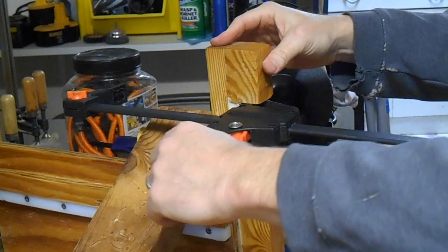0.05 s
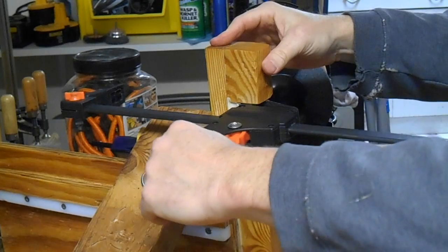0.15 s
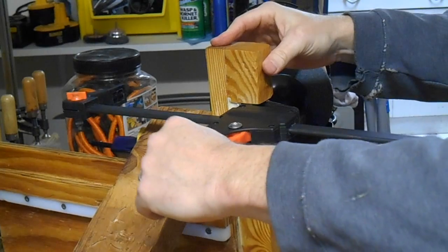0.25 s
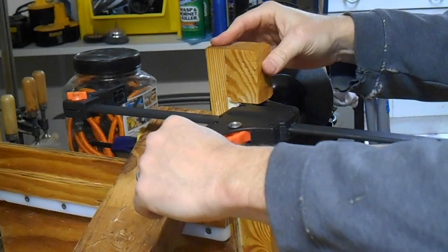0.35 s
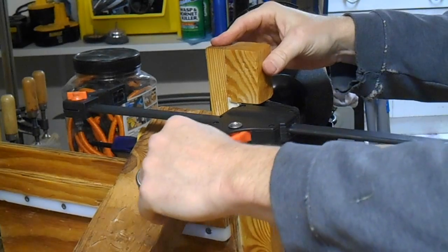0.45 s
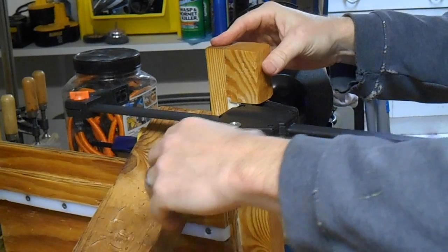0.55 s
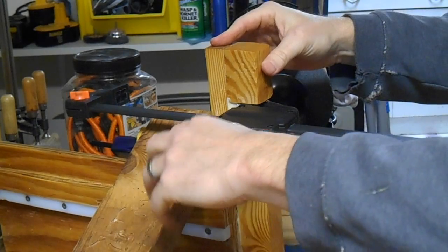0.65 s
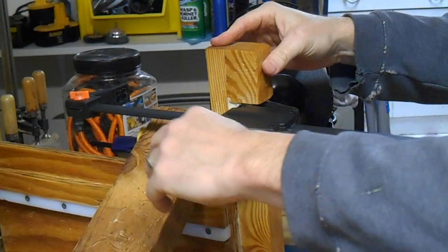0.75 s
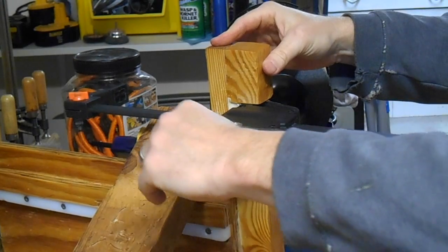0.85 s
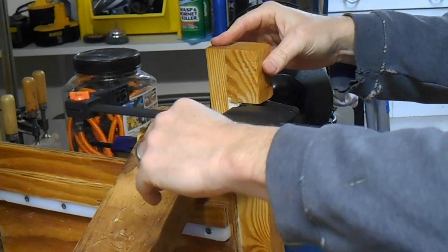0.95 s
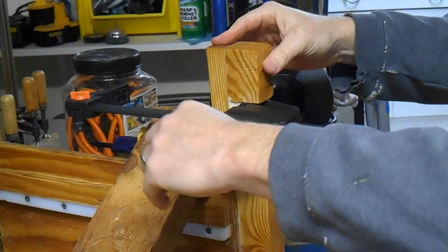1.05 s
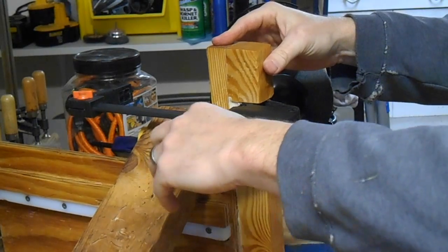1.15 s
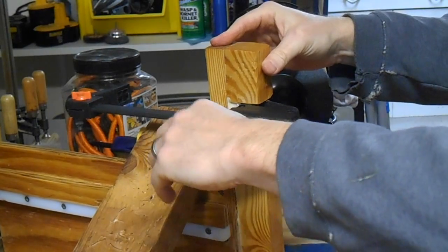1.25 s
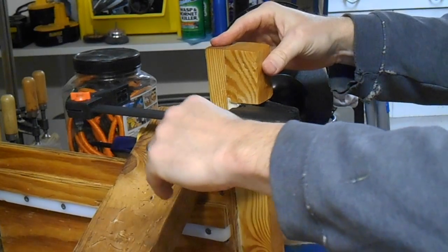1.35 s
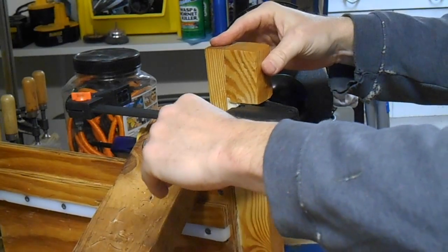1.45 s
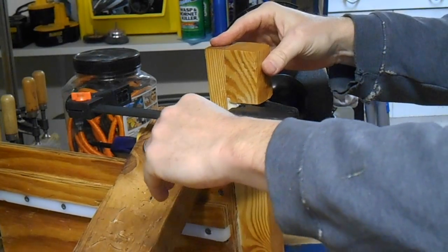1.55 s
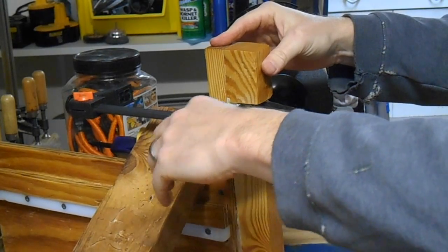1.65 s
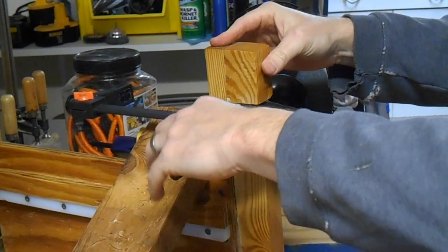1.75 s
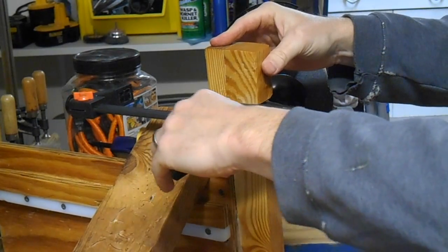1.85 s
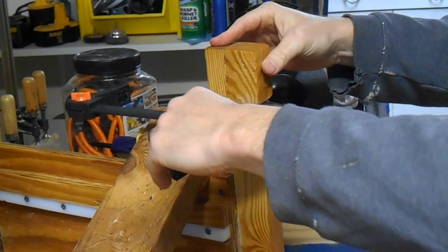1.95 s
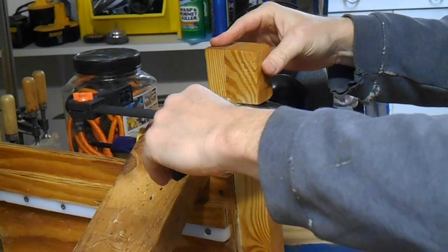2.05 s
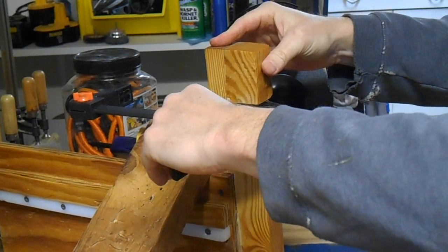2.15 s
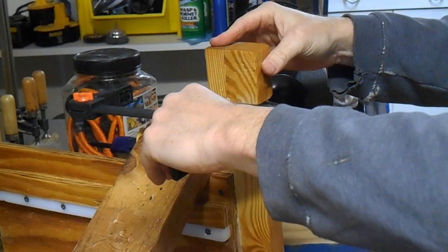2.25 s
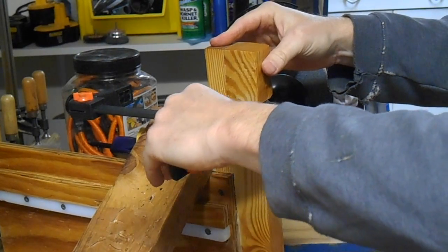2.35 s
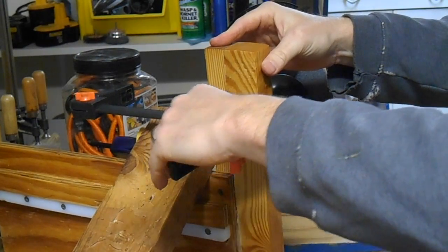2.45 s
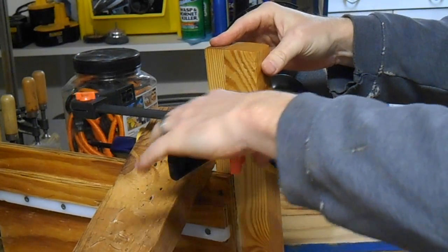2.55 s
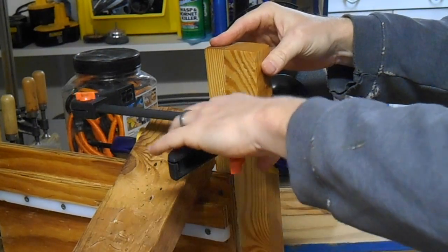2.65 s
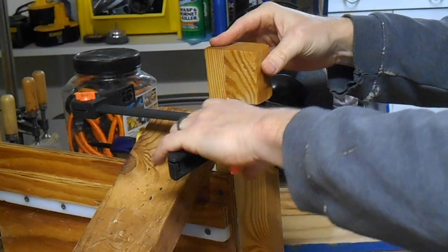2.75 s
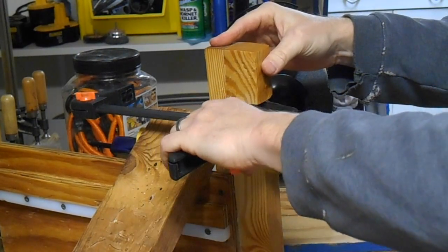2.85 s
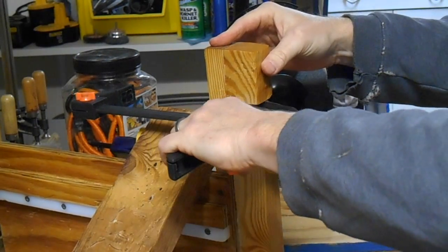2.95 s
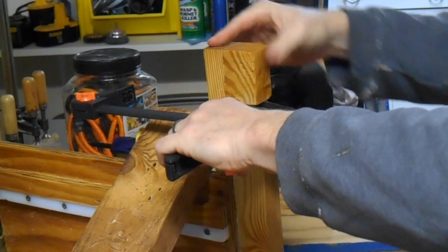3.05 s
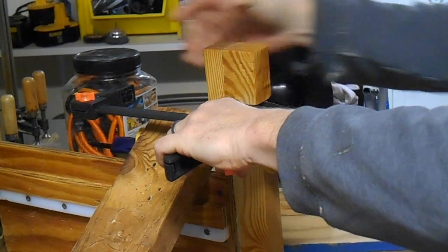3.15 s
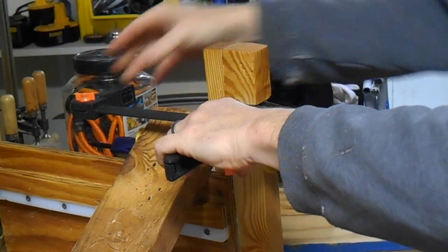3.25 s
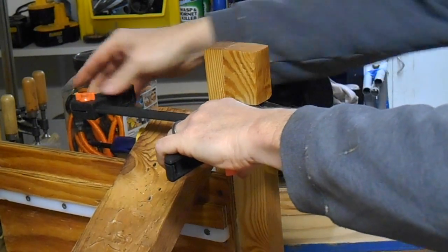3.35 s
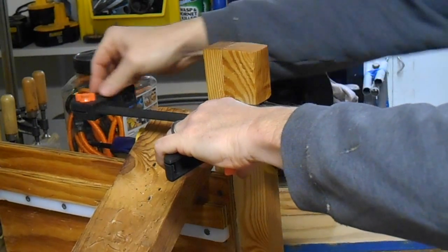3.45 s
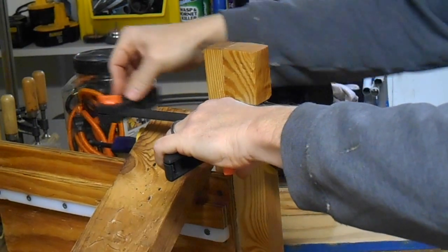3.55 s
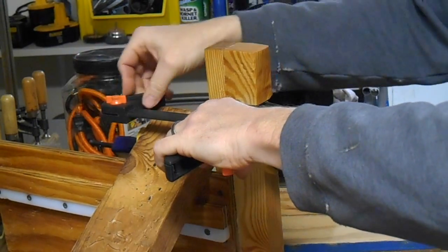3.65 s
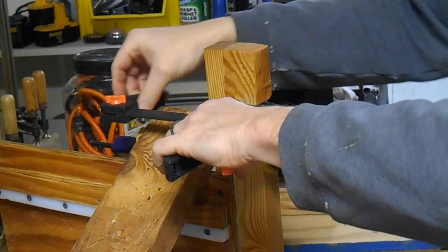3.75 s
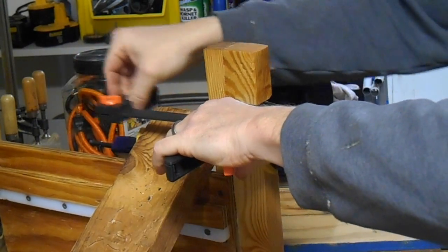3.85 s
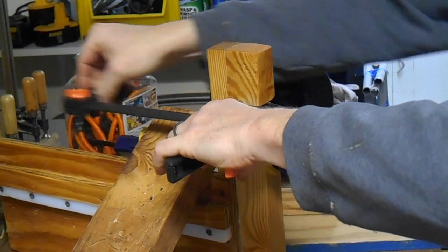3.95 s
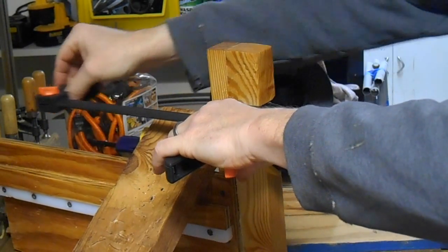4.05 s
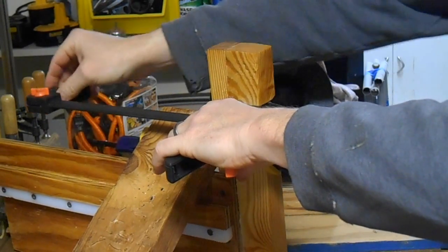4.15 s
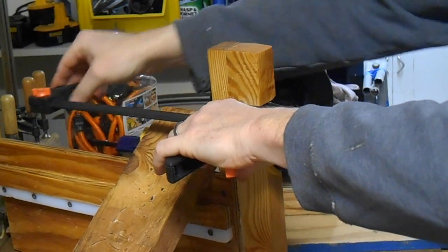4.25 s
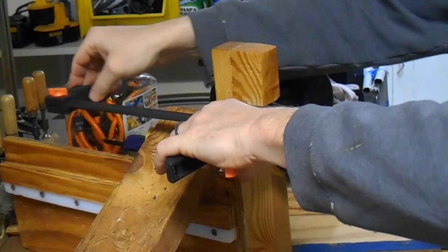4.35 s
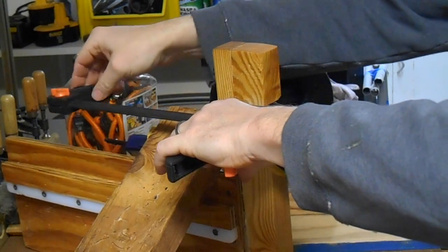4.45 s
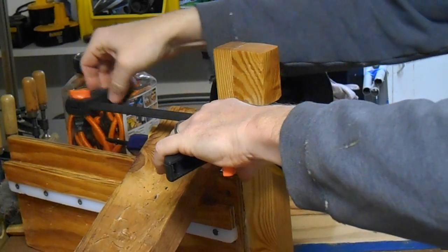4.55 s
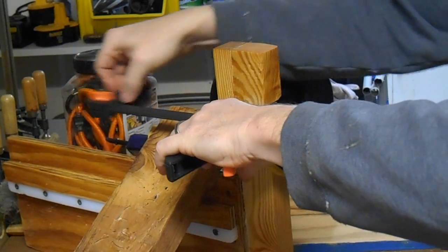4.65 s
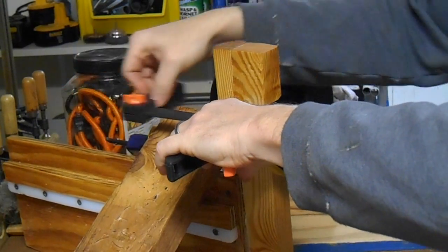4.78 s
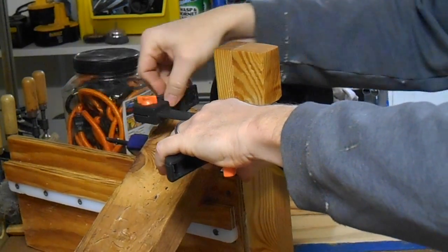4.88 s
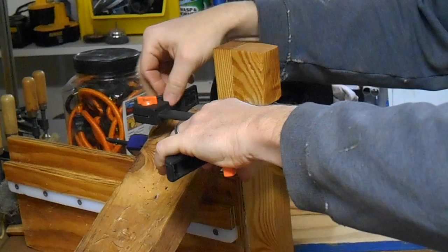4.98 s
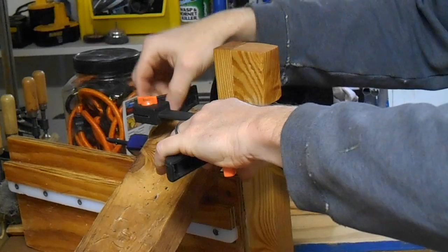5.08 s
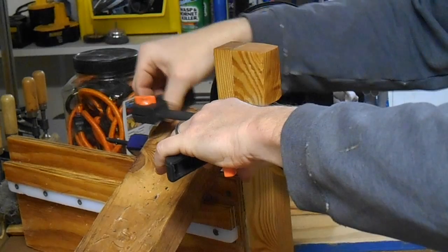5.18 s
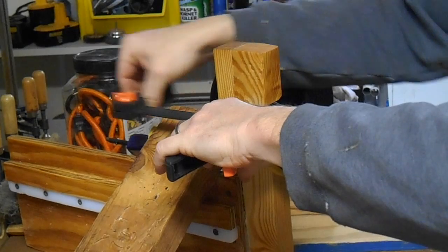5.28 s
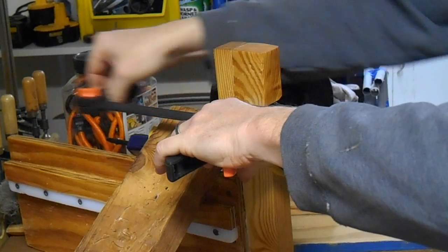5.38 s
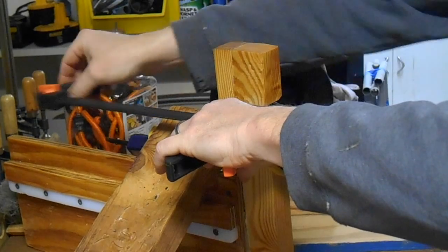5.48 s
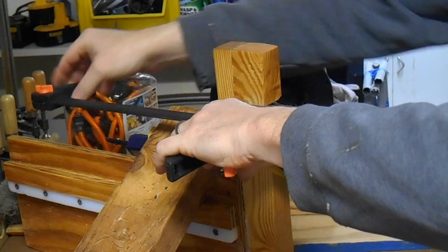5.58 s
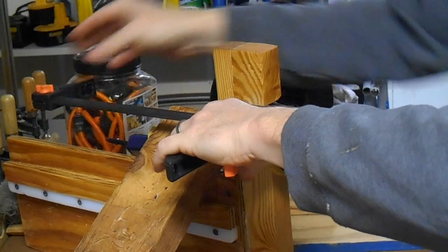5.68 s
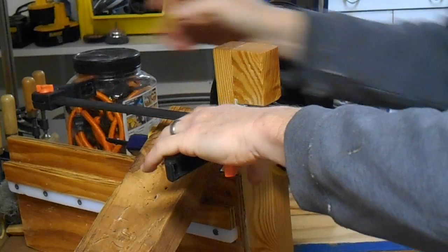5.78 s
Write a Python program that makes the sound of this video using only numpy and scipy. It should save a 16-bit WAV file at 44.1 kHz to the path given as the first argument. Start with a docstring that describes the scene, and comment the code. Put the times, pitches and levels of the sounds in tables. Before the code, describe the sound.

A one-handed bar clamp clicks and chatters through four trigger squeezes, then its steel bar scrapes back and forth, knocking against its stops.

```python
"""Bar clamp in a workshop

A small workshop, one mono microphone close to a one-handed bar clamp. Four squeezes of the trigger
each bite the steel bar and snap it forward; after the first three the sprung trigger chatters back.
Then the bar is pulled to and fro by hand, scraping through the plastic housing and knocking against
its stops. The steel rings, the timber underneath bumps, and the room answers briefly."""
import sys
import numpy as np
from scipy import signal
from scipy.fft import rfft, irfft
from scipy.io import wavfile
from scipy.ndimage import uniform_filter1d

SR = 44100
rng = np.random.default_rng(int(sys.argv[2]) if len(sys.argv) > 2 else 0)


def persist_wave(psi):
    """Save psi, clipped to +-1, as 16-bit WAV."""
    counts = np.round(np.clip(psi, -1, 1) * 32767).astype(np.int16)
    wavfile.write(sys.argv[1], SR, np.atleast_2d(counts).T)


N = 256662
BINS_HZ = np.fft.rfftfreq(2048, 1 / SR)


def amp(db):
    """Decibels to gain."""
    return 10 ** (np.asarray(db) / 20)


def unit(x):
    """Scales to rms 1."""
    return x / np.sqrt(np.mean(x ** 2) + 1e-20)


def decay(t, t60):
    """A free ring loses 60 dB every t60 seconds."""
    return amp(-60 * t / t60)


def read(points, hz):
    """Reads a table on a log-frequency axis."""
    f, value = np.transpose(points)
    return np.interp(np.log(hz + 1), np.log(f + 1), value)


def add(mix, s, sound):
    """Lays a sound into the mix at s seconds."""
    part = mix[max(round(s * SR), 0):][:len(sound)]
    part += sound[:len(part)]


def colour(x, db):
    """Causal filter of unit energy, shaped by db on BINS_HZ."""
    log_gain = np.log(amp(np.concatenate([db, db[-2:0:-1]])))
    taps = np.fft.ifft(np.exp(np.conj(signal.hilbert(log_gain)))).real
    return signal.fftconvolve(x, taps / np.linalg.norm(taps))[:len(x)]


def contact(t60, crack, skid_s=0, rise_s=0.00055):
    """A sharp crack, then the crowded, quickly damped ring of the housing; a skid holds it up."""
    t = np.arange(SR // 8) / SR
    body = decay(np.maximum(t - skid_s, 0), t60)
    envelope = (body + crack * np.exp(-t / 0.0018)) * (1 - np.exp(-t / rise_s))
    return rng.standard_normal(len(t)) * envelope


def clicks(rows, spectrum, gain_db, t60, crack):
    """Firm contacts of one kind; harder ones are brighter."""
    out = np.zeros(N)
    octaves = np.log2(np.clip(BINS_HZ, 700, 12000) / 3500)
    for s, db, hardness, *skid in rows:
        shape_db = read(spectrum, BINS_HZ) + hardness * octaves
        add(out, s, amp(db + gain_db) * colour(contact(t60, crack, *skid), shape_db))
    return out


def ticks(rows, gain_db, t60, crack, sharpness, mellow_ratio):
    """Light contacts, each through one resonance of the part touched; low ones are dull."""
    out, hz = np.zeros(N), BINS_HZ + 1
    for s, db, centre_hz, *_ in rows:
        hump_db = -10 * np.log10(1 + (sharpness * (hz / centre_hz - centre_hz / hz)) ** 2)
        mellow_db = -10 * np.log10(1 + (hz / (mellow_ratio * centre_hz)) ** 4 + (hz / 9500) ** 10)
        tick = colour(contact(t60, crack, rise_s=0.00074), hump_db + mellow_db)
        add(out, s, amp(db + gain_db) * tick)
    return out


# Room tone of the workshop. Each row: frequency in Hz, relative level in dB.
ROOM_TONE = [(25, -6.5), (70, -13.5), (280, -19.5), (620, -21), (1900, -16.5), (3500, -21.5), (9700, -28),
             (11000, -42.5), (13000, -47)]
def air(level_db=-47.5):
    """Steady room noise, strongest in the bass."""
    shape = amp(read(ROOM_TONE, np.fft.rfftfreq(N, 1 / SR)))
    return amp(level_db) * unit(irfft(rfft(rng.standard_normal(N)) * shape, N))


# Handling, close up. Each row: start in seconds, relative level in dB, centre in Hz.
FINGER_TICKS = [(.103, -19, 2480), (0.146, -16.5, 1760), (0.172, -19.5, 7400), (.211, -10, 1850),
                (0.223, -12, 2380), (0.391, -17, 5900), (2.134, -11, 2000), (3.1654, -17.5, 1740),
                (3.5, -12.5, 2040), (3.823, -16, 2230), (3.868, -21, 2040), (4.2613, -10.5, 2000),
                (5.036, -21.5, 5190)]
def touches(fidget_count=22):
    """Loose parts tick under the fingers and in the linkage, among faint chance touches."""
    fidgets = [(when * N / SR, -31 + 3 * (2 * force - 1), 2400 * 2 ** (2 * place - 1))
               for when, force, place in rng.random((fidget_count, 3))]
    rows = FINGER_TICKS + slack() + fidgets
    return ticks(rows, gain_db=-12, t60=0.054, crack=0.083, sharpness=1.3, mellow_ratio=2.57)


def nudges(timber_hz=187.5, clamp_hz=403, lag_s=0.01516):
    """Jumps, trigger returns, touches and knocks push on timber and clamp: rows of (s, dB, Hz)."""
    rows = [(s, -25.5, timber_hz) for s, *_ in jumps()]
    for start, jolt, db in TRIGGER_RETURNS:
        last_tick = start + SLACK_TIMING[-1] * (jolt - start)
        rows += [(last_tick, -29, 288), (jolt + lag_s, db - 27.5, timber_hz)]
    for s, db, _ in FINGER_TICKS:
        rows += [(s, db - 22.5, clamp_hz), (s, db - 26.5, timber_hz)]
    return rows + [(s + lag_s, db - 29, timber_hz) for s, db, _ in BAR_KNOCKS]


# Hollow bumps of the housing and the timber under it.
# Each row: start in seconds, relative level in dB, pitch in Hz, t60 in seconds.
HOLLOW_BUMPS = [(1.455, -26, 190, .15), (1.55, -31.5, 194, .15), (2.134, -28.5, 190, .15),
                (2.215, -33.5, 183, .15), (3.659, -3, 885, 0.046), (3.676, -12.5, 193, 0.057),
                (3.686, -26, 98, 0.25), (4.809, -28.5, 104, 0.22), (4.84, -20, 243, 0.13)]
def bumps(gain_db=-6, nudge_t60=0.16):
    """Each bump or nudge sounds a damped low note with a dull, shorter thud around it."""
    out, t = np.zeros(N), np.arange(SR // 3) / SR
    onset = 1 - np.exp(-t / 0.0018)
    for s, db, hz, t60 in HOLLOW_BUMPS + [(*row, nudge_t60) for row in nudges()]:
        note = np.sin(2 * np.pi * hz * t) * decay(t, t60)
        band_db = -np.minimum(24 * np.log2((BINS_HZ + 1) / hz) ** 2, 60)
        thud = colour(rng.standard_normal(len(t)) * decay(t, 0.69 * t60), band_db)
        add(out, s, amp(db + gain_db) * (note + 0.55 * thud) * onset)
    return out


# The grip shifts faintly. Each row: start and length in seconds, level in dB.
GRIP_RUBS = [(0.264, .11, -41), (4.93, 0.12, -40)]
# The bar is pulled through the housing.
# Each row: start, fastest moment and end in seconds, level in dB, attack in seconds.
BAR_PULLS = [(3.514, 3.629, 3.734, -20.5, 0.095), (3.901, 4.005, 4.187, -22, 0.052),
             (4.332, 4.433, 4.51, -27, 0.024), (4.535, 4.633, 4.667, -17.5, 0.11),
             (4.668, 4.762, 4.955, -19.5, 0.064), (5.25, 5.503, 5.618, -19, 0.04)]
def friction(swell_db_per_s=45, sag_db_per_s=44.5, stop_s=0.029, swing_s=0.04, swing_db=-37):
    """Strength of rubbing: pulls that swell and sag with speed, grip shifts, the trigger's swing."""
    t, pulls = np.arange(N) / SR, 0
    for start, fastest, end, db, attack in BAR_PULLS:
        starting = np.sin(np.pi / 2 * np.clip((t - start) / attack, 0, 1)) ** 2
        stopping = np.clip((end - t) / stop_s, 0, 1)
        drop_db = np.maximum(swell_db_per_s * (fastest - t), sag_db_per_s * (t - fastest))
        pulls = pulls + starting * stopping * amp(db - drop_db)
    rubs = sum(amp(db) * np.interp(t, [s, s + length / 2, s + length], [0, 1, 0])
               for s, length, db in GRIP_RUBS)
    swings = sum(np.interp(t, [s - swing_s, s], [0, 1], right=0) for s, *_ in TRIGGER_SQUEEZES)
    return pulls + rubs + amp(swing_db) * swings


def wander(x, patchy_db=3.5):
    """As the point of contact travels, it favours ever different modes."""
    spectra = signal.stft(x, nperseg=1024, noverlap=768)[2]
    patches = uniform_filter1d(rng.standard_normal(spectra.shape), size=5, axis=0)
    patches = unit(uniform_filter1d(patches, size=10, axis=1))
    spectra *= amp(patchy_db * np.minimum(patches, 2))
    return unit(signal.istft(spectra, nperseg=1024, noverlap=768)[1][:N])


# Steel sliding in plastic, close up. Each row: frequency in Hz, relative level in dB.
SCRAPE_SPECTRUM = [(80, -31), (190, -14.5), (310, -19.5), (520, -17), (860, -4.5), (1040, -15),
                   (1300, -3.5), (2200, -1.5), (3000, -3), (5600, -3.5), (8800, -10), (10200, -20),
                   (11000, -29), (13300, -36.5)]
# Resonances that rubbing draws from the bar. Each row: centre and width in Hz, boost in dB.
RUBBED_MODES = [(416, 37, 13.5), (2270, 400, 3.5), (8660, 180, 6), (10060, 240, 11), (11970, 500, 12)]
def scrape(grains_per_s=14000, spread_db=1.5, judder_db=2.07):
    """Tiny ridges of the bar catch on the housing, while the hand's pressure judders."""
    sizes = amp(spread_db * np.minimum(rng.exponential(1, N), 4)) * rng.choice([-1, 1], N)
    grains = wander(sizes * (rng.random(N) < grains_per_s / SR))
    pressure = amp(judder_db * unit(uniform_filter1d(rng.standard_normal(N), size=300)))
    peaks_db = sum(db / (1 + (2 * (BINS_HZ - hz) / width) ** 2) for hz, width, db in RUBBED_MODES)
    return colour(grains * friction() * pressure, read(SCRAPE_SPECTRUM, BINS_HZ) + peaks_db)


# The trigger is squeezed near the microphone. Each row: start in seconds, relative bite level in dB,
# delay of the bar's jump in seconds, relative jump level in dB, length of its skid in seconds.
TRIGGER_SQUEEZES = [(.597, -1, .018, -4, 0.0028), (1.1485, -1, 0.019, -1.5, 0.0028),
                    (1.691, 1, .0155, 2.5, 0.0067), (2.49, -1, 0.015, 2, 0.0078)]
# Tone of the bite. Each row: frequency in Hz, relative level in dB.
BITE_SPECTRUM = [(100, -25), (420, -9), (1000, -13), (1250, -14), (1600, 0.5), (2300, 1), (2800, -4),
                 (3400, -1), (4300, -6), (6400, -15), (9500, -18.5), (11000, -28), (14000, -46)]
def bites(hardness=0.34):
    """Each squeeze bites the steel bar with a click."""
    rows = [(s, db, hardness) for s, db, *_ in TRIGGER_SQUEEZES]
    return clicks(rows, BITE_SPECTRUM, gain_db=-9.5, t60=0.055, crack=0.24)


def jumps():
    """The bar jumps after each bite, brighter when stronger: rows of (s, dB, dB per octave, skid s)."""
    return [(s + delay, db, -1.13 + 0.5 * db, skid) for s, _, delay, db, skid in TRIGGER_SQUEEZES]


# Tone of the bar's jump. Each row: frequency in Hz, relative level in dB.
SNAP_SPECTRUM = [(80, -30), (330, -10.5), (600, -20.5), (900, -1), (1120, -8), (1450, -2), (2300, 0),
                 (3000, -5.5), (5000, -1.5), (7700, -5), (10000, -14), (11000, -24), (14000, -35)]
def snaps():
    """The bar snaps forward and skids for an instant."""
    return clicks(jumps(), SNAP_SPECTRUM, gain_db=-8, t60=0.031, crack=0.079)


# Low modes of the whole clamp. Each row: frequency in Hz, relative level in dB, t60 in seconds.
CLAMP_MODES = [(411, -5.5, .16), (430, -8, .17), (422, 1.5, .055)]
def flex(gain_db=-16, delay_s=0.00453, rise_s=0.0029):
    """Each jump sets the clamp ringing low: a close pair that beats, and a quick knock."""
    out, t = np.zeros(N), np.arange(SR // 2) / SR
    ring = sum(amp(db) * decay(t, t60) * np.sin(2 * np.pi * hz * t) for hz, db, t60 in CLAMP_MODES)
    for s, *_ in jumps():
        add(out, s + delay_s, amp(gain_db) * ring * (1 - np.exp(-t / rise_s)))
    return out


# The trigger springs back. Each row: start of slack and first jolt in seconds, jolt force in dB.
TRIGGER_RETURNS = [(0.818, 0.88, 3), (1.338, 1.3973, 3.5), (1.937, 2.029, -2.5)]
# Three ticks of the linkage. Each row: level against the jolt in dB, centre in Hz.
SLACK_TICKS = [(-19, 1420), (-13, 2900), (-10.5, 2350)]
# When those ticks fall. Each entry: a share of the time from start of slack to jolt.
SLACK_TIMING = [0, .25, .52]
def slack():
    """The linkage takes up its slack as the grip opens: rows of (s, dB, Hz)."""
    return [(start + share * (jolt - start), jolt_db + db, hz)
            for start, jolt, jolt_db in TRIGGER_RETURNS
            for share, (db, hz) in zip(SLACK_TIMING, SLACK_TICKS)]


# Jerks of the plate. Each row: start in seconds, relative level in dB, hardness in dB per octave.
PLATE_JERKS = [(.8793, 1.5, -1.5), (.8895, -1.5, 0.5), (.9005, -2, -2.5), (.9107, 1, 1),
               (.9222, -2.5, -2.5), (.9298, 1, 1.5), (.9478, -4, -1.5), (.9655, -12, -5.5),
               (1.3988, 5, -1.5), (1.409, -4.5, -1.5), (1.421, -7.5, -3.5), (1.4307, 0, -0.5),
               (1.4437, -5, -2.5), (1.459, -9.5, -3.5), (1.477, -10.5, -1.5), (2.0298, -5, -2),
               (2.0405, -3.5, 1), (2.0495, -8.5, -2.5), (2.060, -6, -1), (2.0715, -11.5, -4),
               (2.0815, -9, 1.5)]
# Tone of a jerk. Each row: frequency in Hz, relative level in dB.
JERK_SPECTRUM = [(80, -31), (380, -13), (580, -26.5), (930, -7.5), (1250, -18.5), (1600, -1.5), (1950, 1),
                 (2700, -8.5), (4200, -8), (6400, -8), (8000, -10), (9300, -26), (10200, -19.5),
                 (11000, -30.5), (14000, -43)]
def chatter():
    """As the trigger returns, the plate slips back along the bar in jerks."""
    return clicks(PLATE_JERKS, JERK_SPECTRUM, gain_db=-10, t60=0.042, crack=0.82)


# The steel plates, close up. Each row: start in seconds, relative level in dB,
# first and second note in Hz, level of the second against the first in dB.
PLATE_CLINKS = [(2.73, -9, 2740, 1720, -9), (4.272, -9.5, 3390, 2050, 1), (5.777, -12.5, 2800, 3300, -3),
                (5.790, -4.5, 2710, 1463, -3)]
def clinks():
    """The plates clink as they settle on the bar."""
    return ticks(PLATE_CLINKS, gain_db=-11, t60=0.041, crack=0.58, sharpness=2.6, mellow_ratio=2.2)


def pings(gain_db=-9, t60=0.026, rise_s=0.0008):
    """Each clink leaves two notes of the plate ringing briefly."""
    out, t = np.zeros(N), np.arange(SR // 4) / SR
    envelope = decay(t, t60) * (1 - np.exp(-t / rise_s))
    for s, db, hz, second_hz, second_db in PLATE_CLINKS:
        notes = np.sin(2 * np.pi * hz * t) + amp(second_db) * np.sin(2 * np.pi * second_hz * t)
        add(out, s, amp(db + gain_db) * notes * envelope)
    return out


# Knocks of the bar. Each row: start in seconds, relative level in dB, hardness in dB per octave.
BAR_KNOCKS = [(3.660, -1.5, -2), (3.666, 1, 3.5), (4.272, -16, -0.5), (4.7708, -7, 6.5), (4.795, 2, -2.5),
              (4.8016, -5, -1), (4.837, -13, -6.5), (5.241, -11, 1), (5.245, -8, -3.5), (5.362, -16.5, -6),
              (5.623, -10.5, 3.5)]
# Tone of a knock. Each row: frequency in Hz, relative level in dB.
KNOCK_SPECTRUM = [(80, -31), (580, -26), (820, -1), (1170, -9), (1950, 4.5), (2600, 1), (3300, 4),
                  (4200, 3), (6500, 3.5), (7300, -4), (10200, -12), (11200, -20), (14000, -42)]
def knocks():
    """The sliding bar strikes the housing and its stops."""
    return clicks(BAR_KNOCKS, KNOCK_SPECTRUM, gain_db=-3.5, t60=0.039, crack=0.33)


# The steel binds. Each row: start and length in seconds, level in dB, first and last pitch in Hz.
BAR_SQUEALS = [(4.716, 0.058, -26, 8650, 8720), (5.36, 0.0258, -14, 2373, 1955),
               (5.617, 0.018, -18, 2152, 1890)]
def squeals(waver_hz=135):
    """Stick-slip locks for a moment into a rough, gliding tone."""
    out = np.zeros(N)
    for s, length, db, first_hz, last_hz in BAR_SQUEALS:
        n = int(length * SR)
        waver = unit(uniform_filter1d(rng.standard_normal(n), size=30))
        hz = np.linspace(first_hz, last_hz, n) + waver_hz * waver
        add(out, s, amp(db) * np.sin(2 * np.pi * np.cumsum(hz) / SR) * signal.windows.tukey(n, .3))
    return out


# Modes of the steel bar and plates. Each row: frequency in Hz, relative gain in dB, t60 in seconds.
STEEL_MODES = [(904, -12, 0.17), (1460, 1, 0.05), (1700, -21, 0.18), (1930, -10, 0.039), (2220, -22, 0.16),
               (3390, 1, 0.019), (4955, 1.5, 0.03), (6370, 2, 0.015), (6760, -10, .13), (7580, 3, 0.027)]
def steel(drive):
    """The steel rings on at its own modes when contacts drive it."""
    t, ring = np.arange(SR // 2) / SR, 0
    for hz, db, t60 in STEEL_MODES:
        damping = np.log(1000) / t60
        ring = ring + amp(db) * 2 * damping / SR * decay(t, t60) * np.cos(2 * np.pi * hz * t)
    return signal.fftconvolve(drive, ring)[:N]


# The small workshop around the microphone. Each row: frequency in Hz, t60 in seconds.
WORKSHOP_DECAY = [(150, 0.52), (700, 0.45), (2000, 0.3), (6000, 0.27), (12000, 0.21)]
def room(x, build_s=0.0058):
    """Dense reflections from bench and shelves, each band dying at its own speed."""
    t = np.arange(SR // 2) / SR
    reflections = rng.standard_normal(len(t)) * (1 - np.exp(-(t / build_s) ** 2))
    hz, frame_s, spectra = signal.stft(reflections, SR, nperseg=256)
    spectra *= decay(frame_s, read(WORKSHOP_DECAY, hz)[:, None])
    tail = signal.istft(spectra, SR, nperseg=256)[1]
    return signal.fftconvolve(x, tail / np.linalg.norm(tail))[:N]


def scene():
    """The clamp up close, the workshop well behind it, the same in both channels."""
    hard = bites() + snaps() + chatter() + knocks()
    light = touches() + clinks() + scrape()
    ringing = amp(-2) * steel(hard) + amp(-17.5) * steel(light)  # the hand damps the sliding bar
    clamp = hard + light + ringing + squeals() + pings()
    low = flex() + bumps()
    mono = clamp + amp(-9.5) * room(clamp) + low + amp(-11) * room(low) + air()
    return np.array([mono, mono])


def lowpass(x, hz):
    """Steep band limit."""
    return signal.fftconvolve(x, signal.firwin(255, hz, window=("kaiser", 8), fs=SR), "same")


def record(dry):
    """The microphone's band limit, overload on the hardest blows, and the final cut-off."""
    heard = [lowpass(channel, hz=13700) for channel in dry]
    return np.array([lowpass(np.clip(channel, -1, 1), hz=15900) for channel in heard])


dry = scene()
out = record(dry)
persist_wave(out)
```